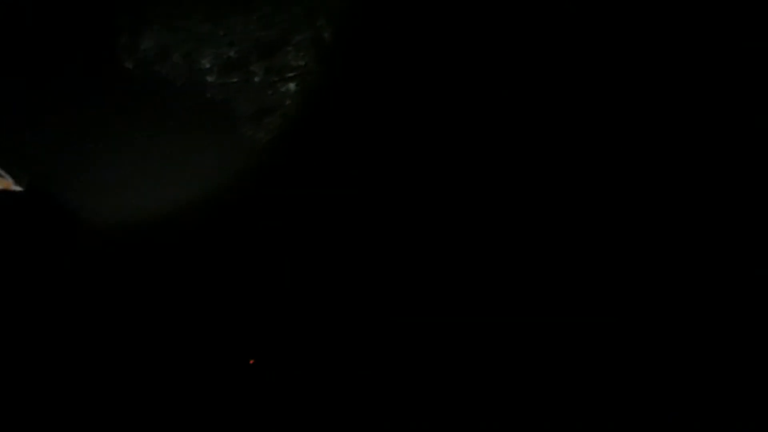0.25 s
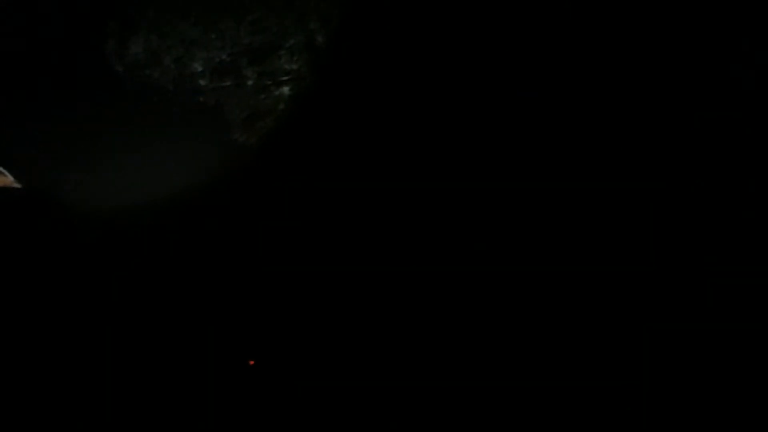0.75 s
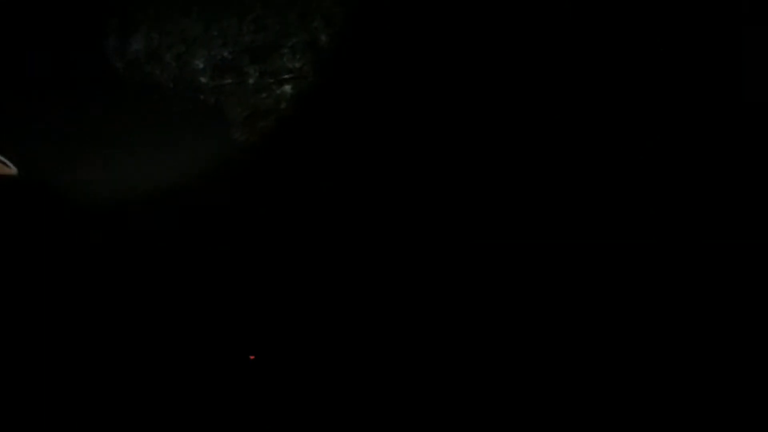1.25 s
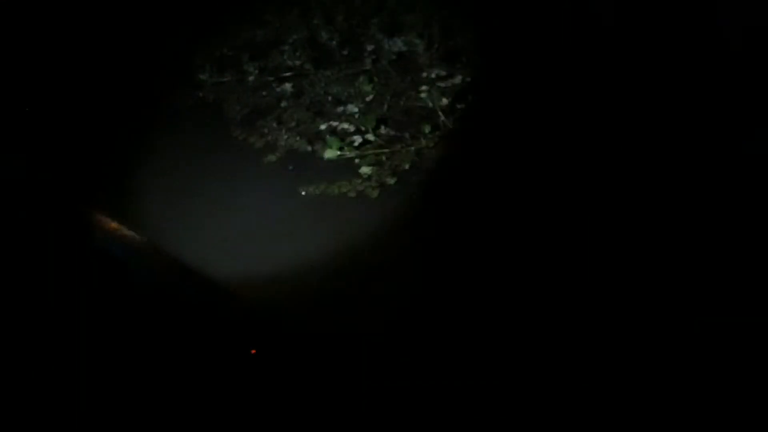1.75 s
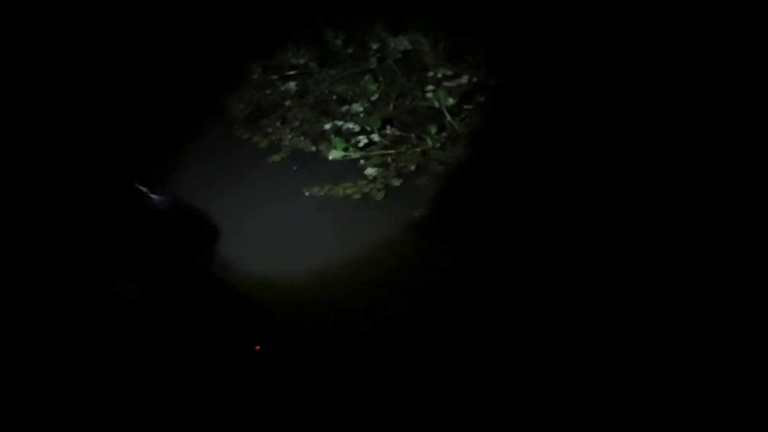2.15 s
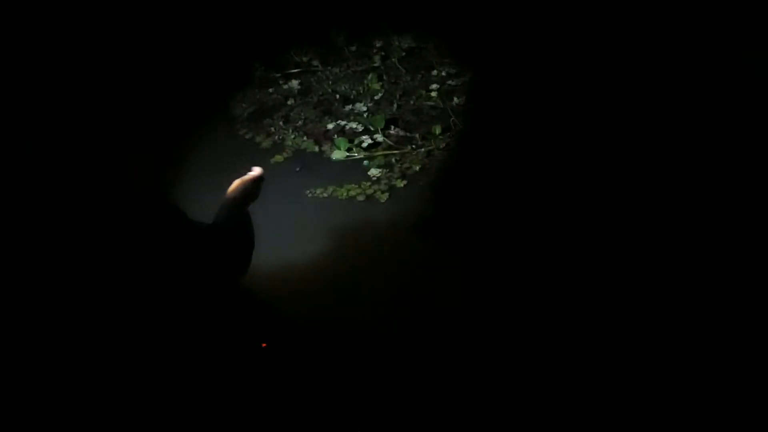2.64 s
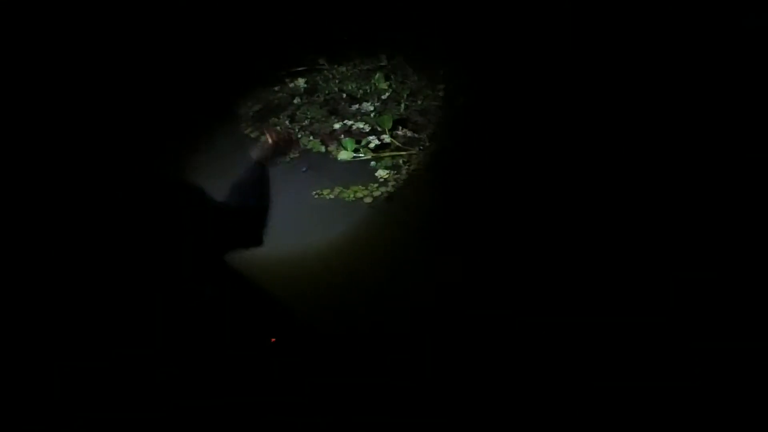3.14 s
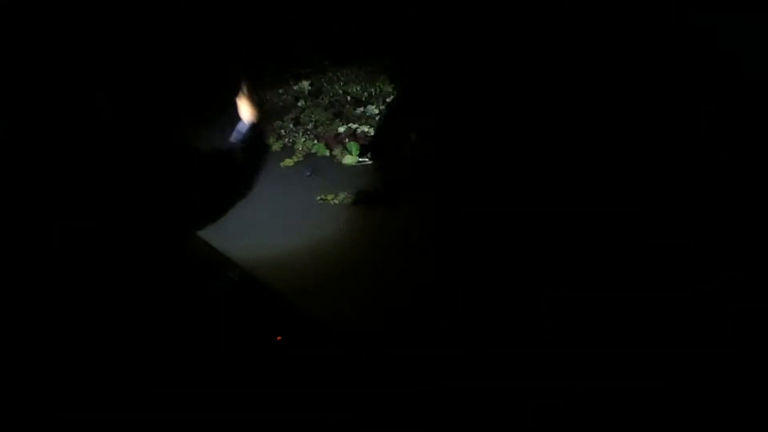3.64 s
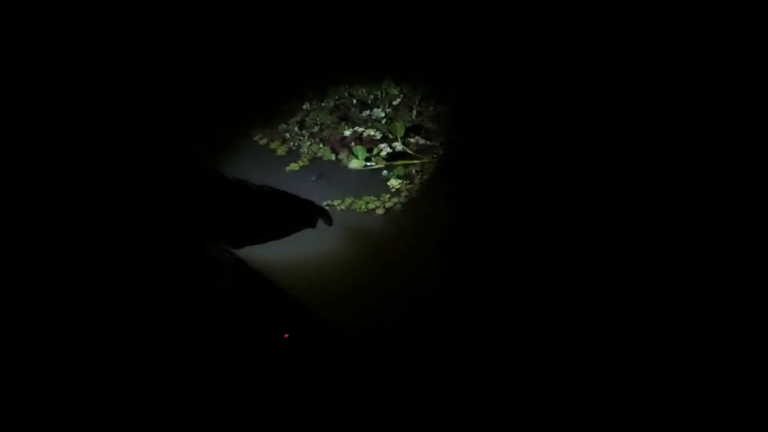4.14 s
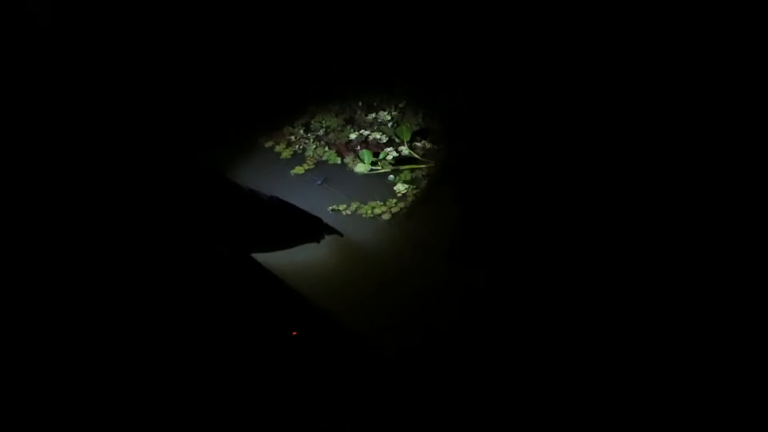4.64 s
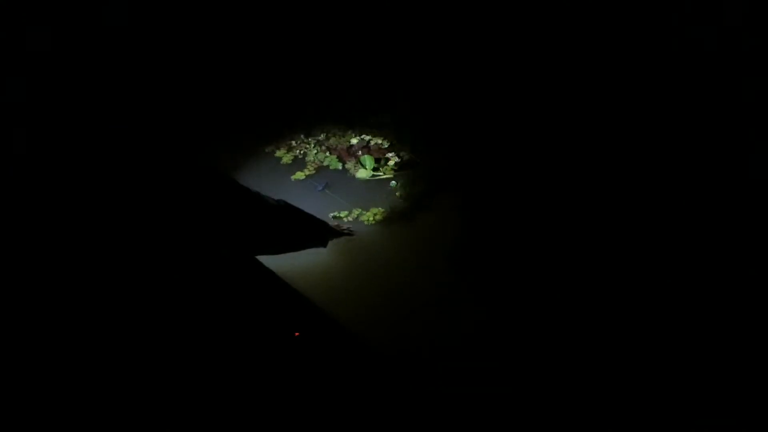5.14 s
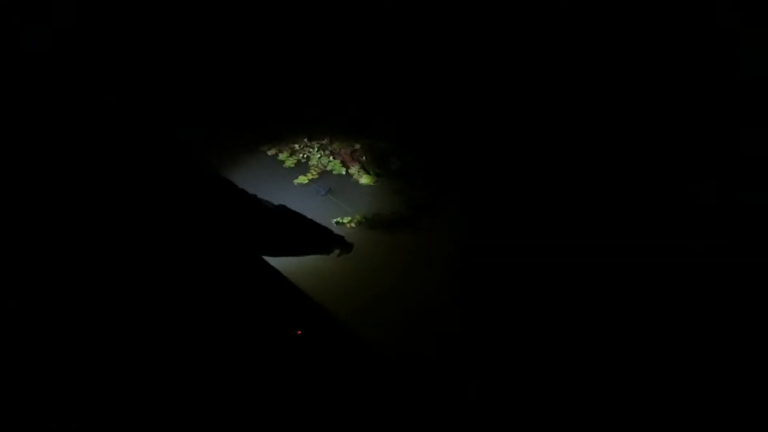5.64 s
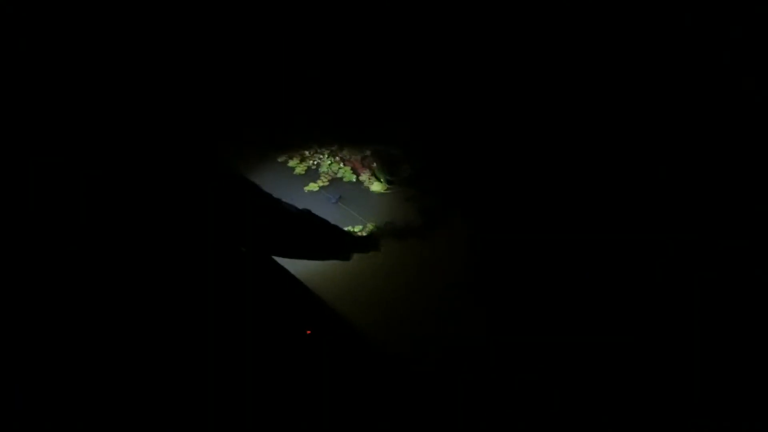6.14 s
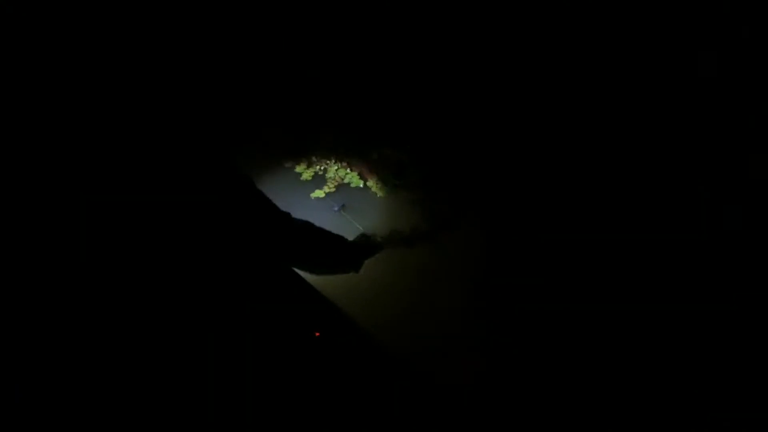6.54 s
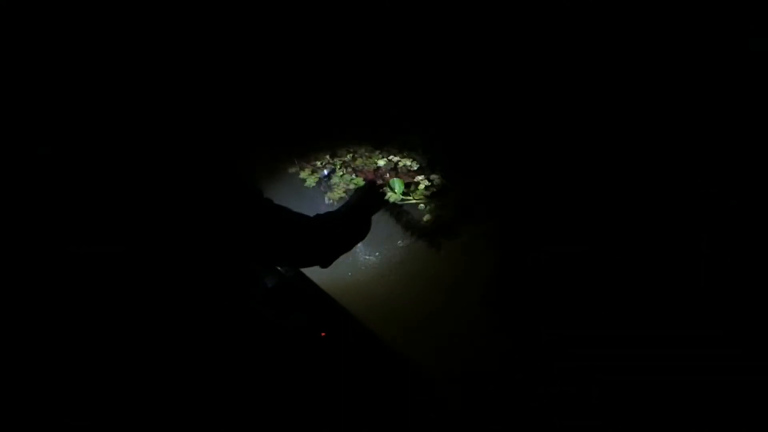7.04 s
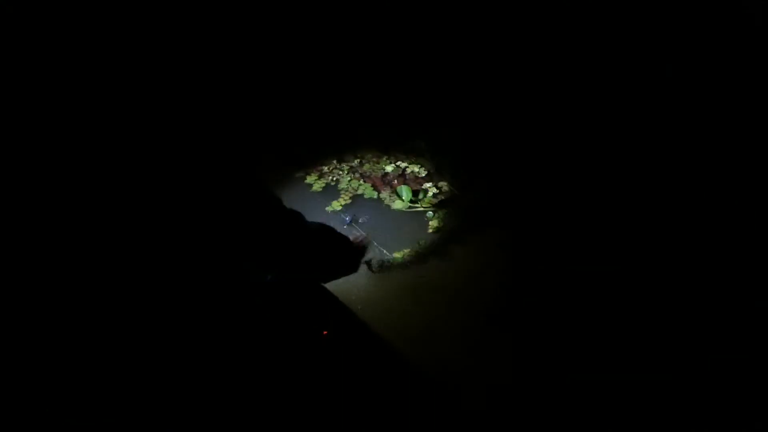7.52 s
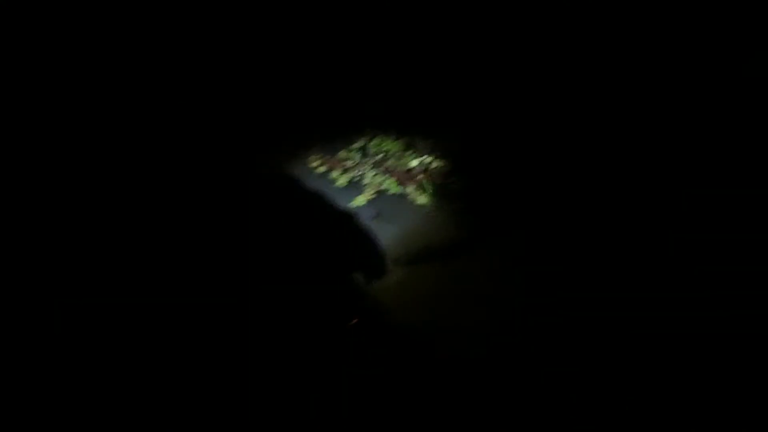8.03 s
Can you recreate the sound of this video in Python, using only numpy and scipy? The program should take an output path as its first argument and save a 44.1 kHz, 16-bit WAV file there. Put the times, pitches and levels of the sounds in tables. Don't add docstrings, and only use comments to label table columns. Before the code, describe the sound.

Heard from a small boat in the dark: thin, very high insect shimmer, with quick scratchy clicks in irregular runs and occasional sharp louder rasps. Soft low bumps and light drips come from the hull, nets and water nearby. Faint frog trills grow into one loud, rising, purring burst after seven seconds, then a hard pole knock follows near the end. Wide stereo, little echo, quiet river air.

```python
import sys
import numpy as np
from scipy import signal
from scipy.fft import rfft, irfft
from scipy.io import wavfile
from scipy.ndimage import uniform_filter1d

SR = 44100
rng = np.random.default_rng(int(sys.argv[2]) if len(sys.argv) > 2 else 0)


def store_pcm(level_fs):
    pcm = np.round(np.clip(level_fs, -1, 1) * 32767).astype(np.int16)
    wavfile.write(sys.argv[1], SR, np.atleast_2d(pcm).T)


def invert_db(level):
    return 10 ** (np.asarray(level, dtype=float) / 20)


N = 365148
T = np.arange(N) / SR
HZ = np.fft.rfftfreq(N, 1 / SR)

# f/Hz, phase/rad
PORT_PHASE = [(0, 3.55), (260, 3.02), (1980, 2.52), (2500, 1.94), (3010, 1.6), (3360, 1.58), (6800, 0.82),
              (8010, 0.82), (8700, 0.58), (15200, 1.05)]
# f/Hz, level/dB
PORT_BALANCE = [(60, 0.5), (110, -1.5), (200, -5.5), (380, -2), (700, -2), (1290, -2.5), (2380, -2),
                (4400, -1.5), (8120, 6), (15000, 15)]
PORTS = invert_db(np.interp(HZ, *np.transpose(PORT_BALANCE)) / 2)
PORTS = PORTS * np.exp(0.5j * np.interp(HZ, *np.transpose(PORT_PHASE)))


def unit(x):
    return x / np.sqrt(np.mean(x ** 2))


def read(table):
    f, v = np.transpose(table)
    return np.interp(np.log(HZ + 1), np.log(f + 1), v)


def walk(rate):
    k = int(SR / rate)
    held = np.repeat(rng.standard_normal(N // k + 1), k)
    return 1.3 * uniform_filter1d(uniform_filter1d(held, k), k)[:N]


def ring(hz, ms, attack_ms, glide=0.):
    t = T[:SR // (8 if hz < 1500 else 20)]
    tone = np.sin(2 * np.pi * hz * t * (1 + glide * np.minimum(t / (0.013 * ms), 2)))
    shape = (1 - np.exp(-t * 1000 / attack_ms)) * np.exp(-t * 1000 / ms)
    return tone * shape / shape.max()


def add(out, s, x):
    i = max(int(s * SR), 0)
    out[i:i + len(x)] += x[:N - i]


def echo(x, t60, wet_db):
    t = np.arange(int(t60 * SR)) / SR
    tail = rng.standard_normal((2, len(t))) * np.exp(-np.log(1000) * t / t60)
    tail /= np.sqrt(np.sum(tail ** 2) / 2)
    return invert_db(wet_db) * signal.fftconvolve(x[None], tail, axes=1)[:, :N]


def ports(x, pan_db=0.):
    half = PORTS * invert_db(pan_db / 2)
    return irfft(rfft(x) * np.array([half, 1 / half]), N)


def spread(gain, loose):
    re, im = rng.standard_normal((2, 3, len(HZ)))
    common, left, right = (re + 1j * im) * gain * np.sqrt(N / 2)
    pair = [(common + loose * left) * PORTS, (common + loose * right) / PORTS]
    return irfft(pair, N) / np.sqrt(1 + loose ** 2)


def air():
    # f/Hz, spectral level/dB per Hz
    hush = [(30, -100.0), (60, -101.5), (100, -92.5), (200, -91.5), (400, -88), (550, -92), (900, -93),
            (1300, -94.5), (1700, -100.0), (2200, -99.0), (2700, -99.0), (3100, -103.0), (7200, -94.5),
            (8000, -100)]
    # t/s, level/dB
    rustle_levels = [(0, -71.5), (.6, -76), (.9, -69), (1.45, -73), (1.93, -71), (2.44, -73.5), (3.3, -72),
                     (4.96, -74), (6.57, -71.5), (7.05, -72.5), (7.68, -67.5), (7.9, -74), (8.08, -65.5),
                     (8.28, -73)]
    rustle = np.interp(T, *np.transpose(rustle_levels))
    out = 0
    for hz in 31 * 2 ** np.arange(9):
        band = np.cos(np.pi / 2 * np.clip(np.log2((HZ + 1) / hz), -1, 1))
        noise = spread(band * invert_db(read(hush)), 0.58 + 0.12 * (hz < 200))
        rustle_share = np.exp(-0.5 * np.log2(hz / 700) ** 2)
        wander_db = min(2.2, 1500 / hz) * walk(6.5)
        out = out + noise * invert_db(wander_db + rustle_share * (rustle + 70.5) - 2.0 * (hz < 70))
    return out * invert_db(45.0)


def chorus():
    # f/Hz, width/Hz, level/dB, throb/dB
    crowds = [(3782, 314, -63.5, 1), (4354, 445, -57.5, 0.5), (5240, 430, -62, 0.5), (5497, 113, -58, 0.5),
              (5823, 270, -53.5, 1), (6250, 250, -59, 1.5), (6550, 160, -67.5, 4)]
    # chirp rate/Hz, wing f/Hz, ring time/ms, level/dB
    singles = [(141.33, 3425, 8., -71), (55.52, 4850, 8., -74)]
    out = 0
    for hz, width, db, throb_db in crowds:
        band = spread(np.exp(-1.25 * ((HZ - hz) / width) ** 2), 0.38)
        out = out + unit(band) * invert_db(db + min(throb_db, 2) * (walk(5.5) + walk(24)))
    for rate, hz, ms, db in singles:
        phase = np.cumsum(rate * (1 + 0.0014 * walk(4))) / SR
        clicks = np.diff(np.floor(phase), prepend=0)
        length = int(ms * SR / 1000)
        chirp = np.hanning(length) * np.sin(2 * np.pi * hz * T[:length])
        song = unit(signal.fftconvolve(clicks, chirp)[:N])
        out = out + ports(song * invert_db(db + 1.0 + 1.3 * walk(3.45) + 2.4 * walk(15)))
    return out


def lens():
    beats = [32, 44, 47, 48, 51, 53, 57, 58, 59, 60, 61, 62, 63, 70, 77, 79, 81, 91, 95, 96, 101, 102, 110,
             116]
    start_s, beat_s = 0.011, 0.06672
    s = start_s + beat_s * np.array(beats)
    chance = rng.standard_normal((len(s), 2)).T
    db = -63.5 + 1.5 * (s - 4.5) + 2.0 * chance[0]
    hz = 1340 * (1 + 0.046 * chance[1])
    return list(zip(s, db, hz))


def drips():
    # t/s, level/dB, f/Hz
    taps = [(0.932, -58, 1020), (1.002, -63, 930), (1.12, -68, 890), (2.732, -50.5, 1330),
            (2.78, -60, 1400.0), (2.822, -63, 1720), (2.865, -66, 1700), (2.911, -57.5, 2060),
            (3.27, -66, 1912), (5.535, -54, 990), (5.533, -61, 1280), (5.572, -58, 938),
            (5.683, -57.5, 1310), (5.819, -56, 1250), (5.567, -63, 1846), (5.6, -57, 1067),
            (5.974, -56, 1830), (6.505, -55, 1259), (6.576, -49.5, 1860), (7.213, -50, 1830),
            (7.709, -56.5, 1774), (8.005, -53, 1190), (8.122, -56.5, 1710)]
    # t/s, level/dB, first f/Hz, last f/Hz, length/ms
    bubbles = [
        (0.541, -47, 917, 1940, 30),
        (7.217, -42, 1210, 1420, 13),
        (7.239, -33, 965, 865, 37),
    ]
    out = np.zeros(N)
    for s, db, hz in taps + lens():
        add(out, s - 0.003, invert_db(db + 10.0) * ring(hz, 5600 / hz, 1, 0.016))
        add(out, s - 0.003, invert_db(db - 3.5) * ring(0.74 * hz, 5.5, 1.0))
        add(out, s - 0.003, invert_db(db - 6.0) * ring(1.9 * hz, 1.6, 0.82))
    for s, db, first_hz, last_hz, ms in bubbles:
        u = np.linspace(0, 1, int(ms * SR / 1000))
        phase = 2 * np.pi * np.cumsum(first_hz + (last_hz - first_hz) * u) / SR
        add(out, s, invert_db(db - 13 * u) * np.sin(phase))
    return ports(out, pan_db=-2) + echo(out, 0.1, -12)


def bumps():
    # t/s, level/dB, f/Hz
    blows = [(0.208, -74, 276), (0.679, -70, 270.0), (0.8, -72.5, 180), (0.928, -63, 393),
             (0.945, -65.5, 230), (1.001, -63, 402), (1.13, -68.5, 166.7), (1.181, -65.5, 183),
             (1.5, -67, 190), (1.535, -68.5, 181), (1.15, -67, 187), (1.83, -72, 280.0),
             (2.251, -67, 294.5), (2.98, -57.5, 324), (3.041, -70, 330.0), (3.236, -67, 195),
             (3.262, -64, 185), (3.304, -64.5, 175), (3.45, -68, 390), (2.925, -72, 185),
             (8.16, -70.5, 350), (3.462, -62, 185), (3.479, -74, 166), (4.349, -71, 193), (4.385, -69, 330),
             (5.28, -58.5, 287), (5.306, -66, 280), (5.325, -64, 271), (5.347, -59.5, 279),
             (5.39, -68, 318), (5.43, -66.5, 305), (7.419, -64.5, 273), (8.009, -60, 388), (8.05, -65, 187),
             (8.101, -72, 143)]
    out = np.zeros(N)
    for s, db, hz in blows:
        body = ring(hz, 2200 / hz, 5.4)
        body = body + 0.38 * ring(0.653 * hz, 11.0, 15.0) + 0.32 * ring(1.274 * hz, 8.8, 3.2)
        add(out, s - 0.012, invert_db(db + 17.5) * body)
    return ports(out, pan_db=-2) + echo(out, 0.13, -10)


def knocks():
    # t/s, crack level/dB, thud level/dB, thud f/Hz
    blows = [
        (.929, -58.5, -52, 96),
        (1.0, -59.5, -54, 101),
        (1.117, -61, -67, 120),
        (1.572, -64, -73, 129.4),
        (8.0064, -48, -49, 119),
        (8.068, -54, -56.5, 70.8),
    ]
    out, t = np.zeros(N), T[:SR // 5]
    band = signal.butter(2, [150, 1600], "band", fs=SR)
    for s, crack_db, thud_db, hz in blows:
        noise = signal.lfilter(*band, rng.standard_normal(len(t)))
        crack = noise * (np.exp(-t / 0.002) + 0.13 * np.exp(-t / 0.05))
        add(out, s, 11.4 * invert_db(crack_db) * crack)
        add(out, s, invert_db(thud_db) * ring(hz, 12.0, 2.7))
    return ports(out, pan_db=-8.5)


def rattle():
    # t/s, level/dB, lowest mode level/dB
    contacts = [
        (2.729, -50, -1),
        (2.777, -51.5, 0),
        (2.82, -52, -9),
        (2.864, -50.5, -4),
        (2.91, -54, -7),
    ]
    # f/Hz, ring time/ms, level/dB
    modes = [(1250, 2.4, -0.5), (1640, 2.05, -8), (2253, 2.5, -2), (2600, 2, -6), (3380, 2.6, -0.5)]
    out = np.zeros(N)
    for s, db, low_db in contacts:
        for hz, ms, mode_db in modes:
            tone = ring(hz * (1 + 0.05 * rng.standard_normal()), ms, 0.87)[:SR // 20]
            add(out, s, invert_db(db + mode_db + low_db * (hz < 1400)) * tone)
    return ports(out, pan_db=-5.0) + echo(out, 0.055, 1.4)


def frogs():
    # first pulse t/s, last pulse t/s, top level/dB, swell/dB, last f/Hz
    trills = [(0.222, 0.399, -64, -2, 2420), (1.759, 1.861, -65, -1, 2540), (5.997, 6.063, -60, 0, 2520),
              (6.069, 6.278, -59.5, -4, 2770), (6.52, 6.727, -54.5, 6, 2590),
              (6.745, 6.767, -54, -2.5, 2555), (6.797, 6.952, -62, 1, 2840), (7.08, 7.265, -46, 14, 2490),
              (7.277, 7.288, -49, -8, 2460), (7.369, 7.632, -31, 22, 2586), (7.665, 7.682, -36, 3, 2570),
              (7.72, 7.856, -54, 5, 2610), (7.878, 7.902, -53, -2, 2550), (7.926, 7.956, -52, -2, 2575),
              (8.143, 8.277, -49.5, 5, 2480)]
    climb_hz_per_s = 1000
    near, far = np.zeros((2, N))
    for first, last, db, swell_db, last_hz in trills:
        first_hz = last_hz - climb_hz_per_s * (last - first)
        count = int(round((last - first) / 0.01005)) + 1
        chance = rng.standard_normal((40, 3))
        for u, (late, loud, sharp) in zip(np.linspace(0, 1, count), chance):
            slack = swell_db * (1 - u) ** 2.4
            hz = first_hz + (last_hz - first_hz) * u ** 1.06
            hz = hz * (1 + (0.0023 + 0.00052 * (-33 - db)) * sharp)
            ms = (3.3 if db > -45 else 2.3) * invert_db(-0.35 * slack)
            pulse = ring(hz, ms, 1.2)
            pulse = pulse + 0.08 * ring(0.89 * hz, 2.6 * ms, 1.9) + 0.084 * ring(1.4 * hz, 0.8 * ms, 1.1)
            fading = 7 * (u == 1) * (count > 20)
            level = db - slack - fading + (0.3 + 0.066 * (-26 - db)) * loud
            s = first + u * (last - first) + 0.00022 * late
            add(far if db < -45 else near, s, pulse * invert_db(level))
    throat = signal.butter(2, [1900, 3150], "band", fs=SR, output="sos")
    near, far = signal.sosfilt(throat, [near, far])
    far = 0.9 * far + echo(far, 0.05, -8)[0]
    direct = near + echo(near, 0.04, -20)[0] + far
    return ports(direct, pan_db=-6.5) + echo(near + far, 0.12, -19)


def strokes():
    # centre t/s, level/dB, length/ms
    nearest = [
        (1.402, -24.5, 23.4),
        (2.446, -25.5, 27),
        (3.497, -25, 24.7),
        (5.362, -26, 27),
        (6.681, -25, 25),
        (7.635, -26, 29.4),
    ]
    # centre t/s, level/dB, mirror f/Hz, mirror level/dB
    clicks = [(.519, -36.5, 9700, -25.5), (.734, -39, 9750, -26), (1.176, -42.5, 10000, -26),
              (1.22, -42, 9910, -28), (1.272, -38, 10100, -28), (1.483, -36, 9600, -25),
              (1.673, -48, 9500, -27), (1.733, -39.5, 10160, -32), (1.979, -44, 9150, -21),
              (2.314, -43.5, 10200, -29), (2.507, -37, 10270, -29), (2.808, -42, 9980, -29),
              (2.939, -38.5, 9200, -24), (3.012, -41, 10900, -35), (3.325, -41.5, 10100, -29),
              (3.568, -43, 9760, -28), (3.878, -42.5, 9160, -28), (3.933, -46, 10000, -28),
              (4.413, -38, 9900, -25), (4.559, -43, 10500, -28), (4.593, -47, 10220, -25),
              (5.734, -35.5, 10900, -26), (6.324, -38, 9150, -17), (6.345, -45, 9600, -28),
              (7.858, -41, 9190, -28), (8.028, -38, 9200, -18.5), (8.047, -47, 10200, -28)]
    # centre t/s, level/dB, mirror f/Hz, mirror level/dB
    rasps = [(.378, -45, 9560, -31), (.444, -50, 10800, -29), (1.028, -43, 10000, -26),
             (1.613, -43.5, 9980, -28), (2.23, -40.5, 9760, -26), (3.622, -38, 10600, -26),
             (3.955, -48, 10240, -32), (4.035, -48, 10200, -29), (4.513, -40.5, 9620, -31),
             (4.617, -37, 10270, -27), (6.061, -40, 9800, -28), (6.134, -41, 9500, -27),
             (6.208, -43, 10540, -26), (6.274, -47, 10160, -32), (6.885, -38.5, 10700, -24),
             (7.043, -47, 10240, -29), (7.507, -41, 10100, -29), (8.081, -40, 10700, -21)]
    # centre t/s, level/dB
    weak = [(.673, -55), (1.32, -51.5), (1.705, -50), (2.052, -64), (2.088, -57), (2.287, -54),
            (2.385, -51), (2.779, -50), (3.145, -55), (3.192, -55), (3.233, -55), (3.432, -51),
            (3.454, -50), (3.659, -46), (4.122, -55), (4.155, -58), (4.2, -58), (4.266, -54), (4.315, -57),
            (4.483, -46), (5.447, -52), (5.777, -56), (5.812, -57), (5.991, -60), (7.424, -60),
            (8.118, -55), (8.177, -58)]
    faint = [.317, 0.576, .638, 1.34, 1.364, 2.343, 3.104, 3.271, 3.39, 4.075, 4.243, 4.347, 5.296, 5.952,
             6.18, 6.241, 6.563, 7.33, 7.368, 7.568, 8.146, 8.202, 8.248]
    # first t/s, last t/s, stroke rate/Hz, first level/dB, last level/dB
    runs = [(0.057, 0.252, 31, -41.5, -46.5), (0.792, .893, 26.6, -41, -40),
            (0.926, 0.988, 37, -40.5, -42.5), (1.077, 1.136, 32, -45, -49), (1.546, 1.578, 32, -41, -50),
            (1.768, 1.906, 25.6, -45.5, -51), (2.555, 2.681, 30, -46, -44), (2.708, 2.882, 32, -47.5, -47),
            (3.689, 3.78, 35, -45.5, -44), (3.811, 3.9, 29, -50, -49), (4.666, 4.83, 32, -42.5, -41.5),
            (4.872, 5.021, 23.7, -41, -41), (5.066, 5.225, 26, -39, -42), (5.469, 5.677, 27, -49, -48.5),
            (6.375, 6.411, 43, -48, -41), (6.452, 6.534, 26, -39.5, -41.5), (6.6, 6.642, 17, -51, -50),
            (6.769, 6.829, 39, -45.5, -42), (6.953, 6.986, 23, -49, -45), (7.078, 7.185, 29, -53, -53.5),
            (7.717, 7.801, 40, -44, -43), (7.833, 7.98, 33.5, -45, -48)]
    mirror_hz, mirror_db = 10250, -26.5
    click_ms, rasp_ms, faint_ms, faint_db = 25, 39, 23, -50
    stroke_share, scatter_db = 0.48, 0.8

    rows = [(s, db, click_ms, hz, ring_db) for s, db, hz, ring_db in clicks]
    rows += [(s, db, rasp_ms, hz, ring_db) for s, db, hz, ring_db in rasps]
    rows += [(s, db, ms, mirror_hz, mirror_db - 6.5) for s, db, ms in nearest]
    for s, db in weak + [(s, faint_db) for s in faint]:
        hz = mirror_hz * (0.96 + 0.045 * rng.standard_normal())
        rows.append((s, db, faint_ms, hz, mirror_db))
    for first, last, rate, first_db, last_db in runs:
        count = int(round((last - first) * rate)) + 1
        chance = rng.standard_normal(12)
        hz = mirror_hz * (0.975 + 0.03 * chance[-1])
        levels = np.linspace(first_db, last_db, count) + scatter_db * chance[:count]
        for s, db in zip(np.linspace(first, last, count), levels):
            rows.append((s, db, 1000 * stroke_share / rate, hz, mirror_db))
    return rows


def katydids():
    # f/Hz, spectral level/dB per Hz
    near_wing = [(4120, -62.5), (7000, -28), (7510, -16), (8210, -18), (8660, -7), (9800, -3), (10250, 3),
                 (10700, -3.5), (11200, -0.5), (11700, -5), (13100, -5), (14300, -15.5), (15000, -32),
                 (15500, -35)]
    # f/Hz, spectral level/dB per Hz
    far_wing = [(4710, -43), (8000, -12), (8320, -17), (9010, -1), (10000, -4.5), (10400, 1.5), (10800, -8),
                (11600, -6.5), (12800, -13.5), (14400, -21), (15000, -28)]
    # t/s, level/dB
    crowd_levels = [(0, -54.5), (.7, -58), (1.0, -56), (1.68, -55), (1.96, -63), (2.17, -58.5),
                    (2.5, -54.5), (3.2, -59.5), (3.71, -59.5), (4.2, -60), (4.68, -55.5), (5.4, -54),
                    (5.93, -58), (6.3, -56.5), (6.8, -56.5), (7.3, -58), (7.8, -56.5), (8.28, -59)]
    mirror_ms, mirror_peak = 1.1, 1.3
    upper_hz, upper_spread_hz, upper_db = 11970, 750, -5
    near_plateau, stop_share = 0.89, 0.91
    near_scramble, far_scramble = 0.45, 0.85
    crowd_dull_db_per_khz = -2

    teeth, mirror = np.zeros((2, N)), np.zeros(N)
    for s, db, ms, hz, mirror_db in strokes():
        chance = rng.standard_normal((80, 2)).T
        patch_hz = upper_hz + upper_spread_hz * chance[0, -1]
        span = 1.7 * ms / 1000
        gaps = np.linspace(1.25e-3, 0.4e-3, num=80) * (1 + 0.045 * chance[0])
        u = np.cumsum(gaps) / span
        u, size = u[u < 1], invert_db(chance[1])[u < 1]
        close = db > -30
        if close:
            u, size = u[u < stop_share], np.sqrt(size[u < stop_share])
        force = np.sin(np.pi * u ** 1.29) ** (near_plateau if close else 1.1)
        at = np.clip(((s + (u - 0.575) * span) * SR).astype(int), 0, N - 1)
        near = np.clip((db + 46) / 12, 0, 1)
        teeth[:, at] += invert_db(db + 21.5) * force * size * np.array([[near], [1 - near]])
        blows = np.zeros(at[-1] - at[0] + 1)
        blows[at - at[0]] = invert_db(db + 21.5 + mirror_db) * force ** (1 + mirror_peak) * size
        tone = ring(hz, mirror_ms, 0.2) + invert_db(upper_db) * ring(patch_hz, mirror_ms, 0.2)
        add(mirror, at[0] / SR, np.convolve(blows, tone[:SR // 100]))

    phase = np.interp(HZ, np.arange(200) * 115., rng.standard_normal(200))
    scramble = np.exp(1j * np.outer([near_scramble, far_scramble], phase))
    inside = (HZ > 6500) & (HZ < 15600)
    wings = invert_db([read(near_wing), read(far_wing) + 1.45]) * inside
    song = irfft(np.sum(rfft(teeth) * wings * scramble, axis=0), N) + mirror

    dull = invert_db(crowd_dull_db_per_khz * np.maximum(HZ - 10800, 0) / 1000)
    crowd = unit(spread(wings[1] * dull, 0.5))
    crowd = crowd * invert_db(np.interp(T, *np.transpose(crowd_levels)) - 1.5 + 2.1 * walk(40))
    direct = ports(song + echo(song, 0.12, -18.5)[0], pan_db=-1.0)
    return direct + echo(song, 0.29, -26.5) + crowd


def scene():
    return air() + chorus() + drips() + bumps() + knocks() + rattle() + frogs() + katydids()


def band_limit(x):
    return signal.sosfilt(signal.butter(12, 15770, fs=SR, output="sos"), x)


def record(dry):
    whine = invert_db(-97 + 5 * walk(8)) * np.sin(2 * np.pi * 15734 * T)
    rolled_off = signal.sosfilt(signal.butter(2, 15500, fs=SR, output="sos"), dry)
    return band_limit(rolled_off + whine)


dry = scene()
out = record(dry)
store_pcm(out)
```